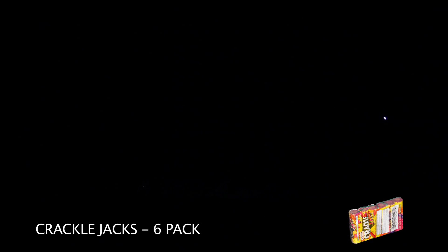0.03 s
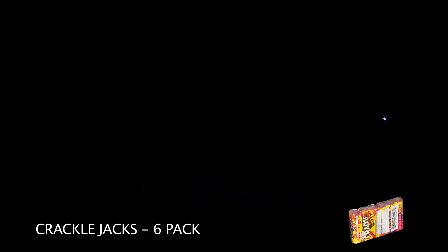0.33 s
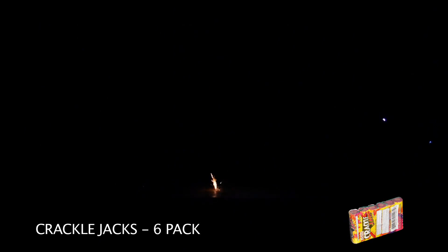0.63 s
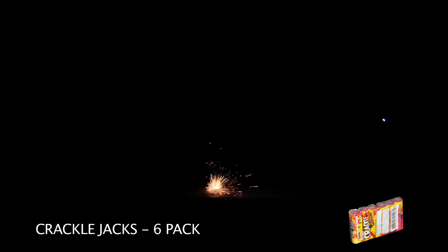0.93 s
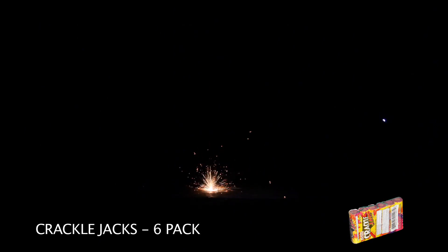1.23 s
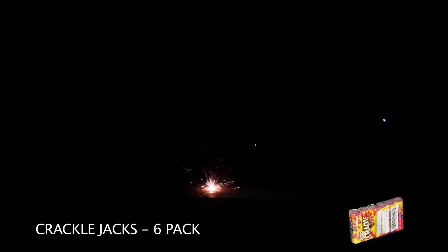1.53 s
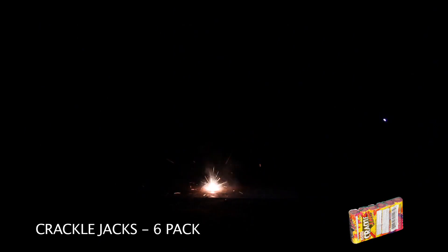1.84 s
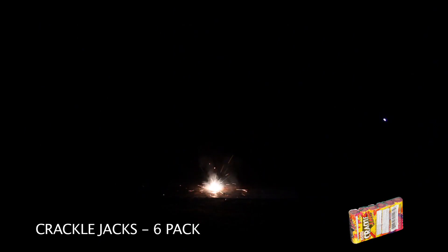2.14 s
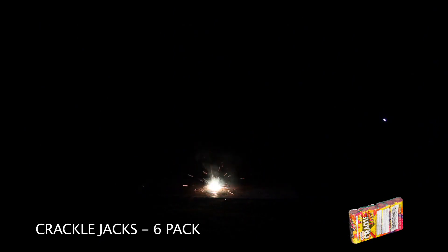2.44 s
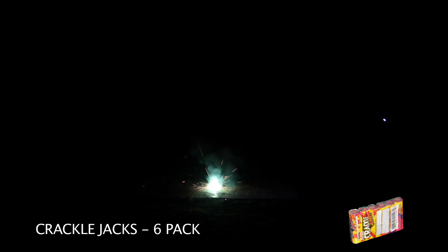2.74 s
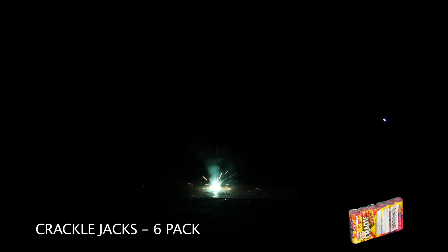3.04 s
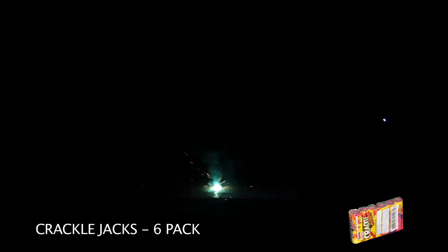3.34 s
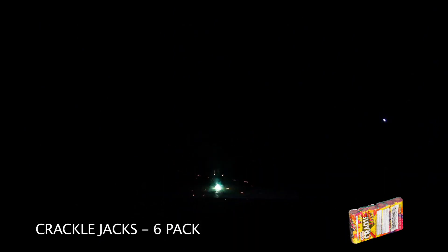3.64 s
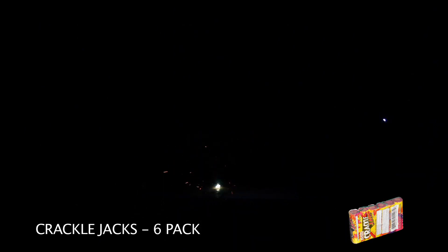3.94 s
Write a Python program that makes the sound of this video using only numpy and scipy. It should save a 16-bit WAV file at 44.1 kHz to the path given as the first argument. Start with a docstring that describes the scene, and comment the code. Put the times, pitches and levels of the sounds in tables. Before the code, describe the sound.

A ground spinner firework catches and hisses steadily, crackling and faintly whirring outdoors.

```python
"""A small ground spinner at night, a few metres away. First a fuse fizzes over night air, a faint tone, a
far-off rush and soft thumps. At 0.6 s the charge catches: a turbulent gas jet hisses and roars, full of
the tiny cracks of burning grains, and spits hardest in its first second. From about 1 s the case spins up
and whirs at two rates, each rotation modulating the hiss. The jet dulls and a few more thumps sound;
near 3.7 s it sags and flares again as the faint tone returns."""
import sys
import numpy as np
from scipy import signal
from scipy.fft import rfft, irfft
from scipy.io import wavfile

SR = 44100
rng = np.random.default_rng(int(sys.argv[2]) if len(sys.argv) > 2 else 0)


def generate_wav(signal):
    """Clip the signal to [-1, 1] and save it as 16-bit WAV at the path in sys.argv[1]."""
    frames = np.transpose(np.atleast_2d(signal))
    scaled = np.clip(frames, -1, 1) * 32767
    pcm = np.round(scaled).astype(np.int16)
    wavfile.write(sys.argv[1], SR, pcm)


N = 176400
TIME, FREQ = np.arange(N) / SR, np.arange(N // 2 + 1) * SR / N


def undb(db):
    """Decibels to amplitude ratio."""
    return 10 ** (np.asarray(db) / 20)


def unit(x):
    """Normalise to rms 1."""
    return x / np.sqrt(np.mean(x ** 2) + 1e-20)


def curve(table, column=1):
    """Linear interpolation of one column in time."""
    rows = np.array(table, float)
    return np.interp(TIME, rows[:, 0], rows[:, column])


def colour(x, spectrum):
    """Minimum-phase filter of unit energy, shaped by (f/Hz, level/dB) points."""
    hz, db = np.array(spectrum, float).T
    cepstrum = irfft(np.log(undb(np.interp(np.log(FREQ + 1), np.log(hz), db))), N)
    cepstrum[1:N // 2] *= 2  # folding makes the filter causal
    cepstrum[N // 2 + 1:] = 0
    response = np.exp(rfft(cepstrum))
    return irfft(rfft(x) * response / np.sqrt(np.mean(abs(response) ** 2)), N)


def noise():
    """Gaussian white noise."""
    return rng.standard_normal(N)


def band(hz, width_hz):
    """Noise filtered by one resonance, rms 1."""
    f = FREQ + 1
    return unit(irfft(rfft(noise()) / (1 + ((f - hz ** 2 / f) / width_hz) ** 2), N))


def walk(hz):
    """Random fluctuation of rms 1, band-limited to about hz."""
    return unit(irfft(rfft(noise()) * np.exp(-2 * (FREQ / hz) ** 2) * FREQ / (FREQ + 2), N))


def split(x, hz, order):
    """Complementary low-pass and high-pass parts."""
    low = irfft(rfft(x) / (1 + (FREQ / hz) ** order), N)
    return low, x - low


def cracks():
    """Shot noise: burning grains click at random, many small and a few large."""
    per_second, spread_db = 2600, 3.0
    size = undb(spread_db * np.minimum(rng.exponential(size=N), 5))
    return unit((rng.random(N) < per_second / SR) * size * np.sign(noise()))


# Spectrum of the fuse: f/Hz, relative level/dB
FUSE_SPECTRUM = [(700,-2),(1100,1),(1650,-0.5),(2200,-1),(3500,-2),(5100,-1),(5400,5),(5700,-1),(7000,-3.5),(9000,-13.5),(12000,-21.5),(15500,-25)]
# Envelope of the fuse: t/s, level/dB
FUSE_ENVELOPE = [(.08,-49),(.21,-48.5),(.29,-45.5),(.37,-46),(.45,-47.5),(.55,-45),(.7,-42.5),(.9,-72)]
def fuse():
    """Combustion noise, brighter when stronger, interferes with its ground reflection."""
    level_db = curve(FUSE_ENVELOPE)
    low, high = split(colour(unit(noise() + .5 * cracks()), FUSE_SPECTRUM), hz=6000, order=4)
    fizz = low + high * undb(0.54 * (level_db + 48))  # treble is lifted above -48 dB, cut below
    reflection = undb(-10) * np.roll(fizz, int(0.00176 * SR))
    return (fizz + reflection) * undb(level_db)


# Spectrum of the outdoor air: f/Hz, relative level/dB
AIR_SPECTRUM = [(20,-8),(40,-27),(70,-7),(110,0),(160,-3.5),(215,-8.5),(330,-2.5),(450,-2),(540,-7),(690,-4.5),(860,-9.5),(1100,-5),(1400,-11.5),(1650,-6.5),(2200,-14.5),(5000,-28),(15000,-54)]
def night_air():
    """Stationary ambient noise, strongest at low frequencies."""
    return undb(-48) * colour(noise(), AIR_SPECTRUM)


# Envelope of the faint tone: t/s, level/dB
HUM_ENVELOPE = [(.08,-49),(.19,-54.5),(.27,-71),(3.6,-70),(3.7,-53),(3.8,-49),(3.88,-71)]
def hum():
    """A sinusoid with slight random frequency modulation, heard at the start and near the end."""
    hz = 332.7 + 2 * walk(9.5)
    return np.sqrt(2) * undb(curve(HUM_ENVELOPE)) * np.sin(2 * np.pi * np.cumsum(hz) / SR)


# Course of the far-off rush: t/s, level/dB, centre f/Hz
RUSH_GLIDE = [(.08,-49,660),(.35,-51,630),(.55,-47,550),(.68,-47,490),(.85,-58,444),(1.5,-82,418)]
def rush():
    """Narrow-band noise: random quadrature modulation of a carrier that sinks in pitch."""
    phase = 2 * np.pi * np.cumsum(curve(RUSH_GLIDE, column=2)) / SR
    return unit(walk(254) * np.sin(phase) + walk(254) * np.cos(phase)) * undb(curve(RUSH_GLIDE))


# Soft thumps: onset t/s, level/dB, centre f/Hz, width/Hz, decay time/s
THUMP_EVENTS = [(.129,-39.5,900,220,.01),(.142,-39,150,85,0.031),(.151,-37.5,80,40,0.054),(1.881,-35.5,293,120,0.012),(1.882,-41,159,70,0.0099),(3.04,-39.5,328,130,0.013),(3.045,-44,130,100,0.016),(3.745,-47,160,70,.05)]
def thumps():
    """Damped resonances: bands of noise rise linearly and decay exponentially."""
    attack_s, out = 0.012, 0
    for onset, db, hz, width_hz, decay_s in THUMP_EVENTS:
        age = np.maximum(TIME - onset, 0)
        envelope = np.minimum(age / attack_s, 1) * np.exp(-np.maximum(age - attack_s, 0) / decay_s)
        out = out + undb(db) * band(hz, width_hz) * envelope
    return out


# Spectrum of the gas jet: f/Hz, relative level/dB
JET_SPECTRUM = [(500,-39),(700,-27),(830,-29.5),(950,-22),(1100,-22.5),(1760,-17.5),(1970,-14),(2100,-15.5),(2280,-11),(2480,-15),(2700,-10),(3030,-12.5),(3450,-4.5),(3750,-9),(3950,-6),(4200,-6.5),(4800,-1),(5100,-2.5),(5450,0),(6350,-3),(6600,-1.2),(7300,-3.5),(7750,-6),(8000,-6.5),(8350,-11.5),(8650,-10),(9500,-13.5),(10500,-17),(11200,-21.5),(11800,-27.5),(12700,-32),(13800,-31),(15500,-38.5)]
# Envelope of the jet: t/s, level/dB
JET_ENVELOPE = [(.6,-50),(.64,-41),(.665,-29),(.765,-17),(.85,-17),(.885,-21.5),(.94,-16),(.98,-24.5),(1.03,-21),(1.11,-23.5),(1.17,-22),(1.4,-21),(1.6,-23.5),(1.73,-19),(1.9,-19),(2.31,-23),(2.37,-21),(2.58,-21),(2.63,-20),(2.705,-17.5),(2.75,-20),(2.8,-17),(2.85,-21),(3.08,-18),(3.14,-20.5),(3.55,-21),(3.63,-26.5),(3.695,-30.5),(3.725,-21.5),(3.85,-19.5),(4,-29)]
# Band gains of the jet, before their offsets: t/s, treble level/dB, middle level/dB, top level/dB
JET_BANDS = [(.7,-16,-19.5,-8),(.8,-13,-18,-20),(.94,-8.5,-14,-4),(1.0,-9,-11,-4),(1.1,-11.5,-12.5,-10),(1.45,-11,-16,-7),(1.62,-8.5,-15.5,-6),(1.8,-11.5,-17,-10),(2.15,-13,-19,-13),(2.3,-15,-16.5,-17),(2.42,-14.5,-16,-12),(2.75,-16,-17,-12),(3.06,-14.5,-15,-9),(3.15,-19,-16.5,-14),(3.54,-18,-13.5,-17),(3.68,-21.5,-6.5,-26.5),(3.74,-17,-12.5,-20),(3.86,-19.5,-14,-23),(4,-18.5,-9,-24)]
def jet(modulation_db):
    """Turbulent jet noise with cracking grains; the directional treble flickers as the nozzle swings."""
    gas = unit(noise() + undb(-6.5) * cracks()) * unit(undb(modulation_db))
    middle, rest = split(colour(gas, JET_SPECTRUM), hz=3150, order=6)
    main, rest = split(rest, hz=6970, order=10)
    treble, top = split(rest, hz=11900, order=24)
    middle *= undb(curve(JET_BANDS, column=2) + 15)
    treble *= undb(curve(JET_BANDS, column=1) + 13)
    top *= undb(curve(JET_BANDS, column=3) + 11)
    beam = unit(undb(1.78 * walk(176)))
    ignition = np.clip((TIME - JET_ENVELOPE[0][0]) / .03 + 1, 0, 1)
    return (main + middle + beam * (treble + top)) * undb(curve(JET_ENVELOPE)) * ignition


# Spectrum of the flame's roar: f/Hz, relative level/dB
ROAR_SPECTRUM = [(40,-19),(80,-5),(110,-8),(140,-6),(175,3.5),(232,-12),(280,4),(380,0.5),(450,-2),(535,-9.5),(700,0),(830,-4),(1100,-3),(2000,-24.5)]
# Envelope of the roar: t/s, relative level/dB
ROAR_ENVELOPE = [(.6,-29),(.78,7),(.92,11.5),(1.06,8),(1.25,7),(1.6,-7),(2.4,-5),(3.05,-3),(3.6,-10),(3.78,3.5),(4,-1)]
def roar(modulation_db):
    """Unsteady combustion radiates low, sputtering noise."""
    gas = unit((noise() + cracks()) * undb(modulation_db))
    return colour(gas, ROAR_SPECTRUM) * undb(curve(ROAR_ENVELOPE) - 52)


# Spits of the charge: t/s, relative swell level/dB, relative snap level/dB
SPIT_EVENTS = [(.856,-22,-9),(.915,-20,-6.5),(.944,-20,-6),(1.0116,-19,-10),(1.023,-18.5,-18),(1.047,-29,-11),(1.056,-19,-7),(1.084,-14,-2),(1.107,-18.5,-20),(1.147,-26,-17),(1.181,-16.5,-15),(1.199,-24,-11),(1.255,-21.5,-6),(1.307,-33,-9.5),(1.317,-30,-15),(1.365,-36,-7),(1.436,-18.5,-12),(1.4559,-38,-2.5),(1.526,-17.5,-26),(1.867,-31,-21),(2.18,-18,-18),(2.219,-19,-28),(2.54,-24,-21),(2.612,-20,-21),(2.671,-21,-8.5),(3.384,-32,-25),(3.563,-23,-8),(3.728,-19.5,-14)]
# Spectrum of a snap: f/Hz, relative level/dB
SNAP_SPECTRUM = [(60,-32),(300,-7),(1000,-8.5),(2200,-2),(5500,-2.5),(8000,-6),(11000,-18),(15500,-38)]
def spits():
    """Pressure transients: a lump of charge flares for milliseconds and snaps with a noisy tail."""
    swell_s, lead_s, tail_s = 0.0028, 0.0011, 0.00073
    swell, snap = np.zeros(N), np.zeros(N)
    for at, swell_db, snap_db in SPIT_EVENTS:
        swell += undb(swell_db) * np.exp(-.5 * ((TIME - at + lead_s) / swell_s) ** 2)
        snap[int(at * SR)] += undb(snap_db)
    debris = signal.lfilter([1], [1, -np.exp(-1 / (tail_s * SR))], snap) * noise()
    return colour(swell * noise(), JET_SPECTRUM) + colour(-1.4 * snap + 0.23 * debris, SNAP_SPECTRUM)


# The case whirling about itself: t/s, rotation f/Hz, level/dB
WHIRL_MOTION = [(.95,18.7,-87),(1.2,59.4,-72),(1.47,103,-59),(1.8,115,-58),(2.07,125,-70),(2.55,135,-58),(3.1,126,-60),(3.5,115,-68),(4,115,-66)]
# Partials of the whirl: harmonic number, relative level/dB
WHIRL_HARMONICS = [(1,0.5),(2,-12),(3,-12)]
# The case rolling more slowly along the ground: t/s, rotation f/Hz, level/dB
ROLL_MOTION = [(1.3,62,-80),(1.65,73,-72),(1.9,93,-57.5),(2.25,98,-58),(2.6,103,-56.5),(2.9,102,-66),(3.25,93,-57.5),(3.6,85,-60),(4,80,-59.5)]
# Partials of the roll: harmonic number, relative level/dB
ROLL_HARMONICS = [(1,-3.5),(2,-1.5),(3,-0.5),(4,-7.5)]
def rotation(motion, harmonics):
    """A rotating body radiates harmonics of its rotation frequency; returns its angle and whir."""
    jitter, waver_db = 0.0029, 2.5
    angle = 2 * np.pi * np.cumsum(curve(motion) * (1 + jitter * walk(31))) / SR
    whir = 0
    for k, db in harmonics:
        amplitude = undb(db + waver_db * walk(9.1))
        whir = whir + amplitude * np.sin(k * angle + 2 * np.pi * rng.random())
    return angle, np.sqrt(2) * whir * undb(curve(motion, column=2))


def scene():
    """Superposition of all sources; one flame modulates hiss and roar, and each turn chops the hiss."""
    flutter, surge_db = walk(480), 0.86 * walk(66)  # fast and slow unsteadiness of the flame
    whirl_angle, whirl = rotation(WHIRL_MOTION, WHIRL_HARMONICS)
    roll_angle, roll = rotation(ROLL_MOTION, ROLL_HARMONICS)
    moving = np.clip((TIME - WHIRL_MOTION[0][0]) / 0.12, 0, 1)
    chop_db = moving * (1.4 * np.sin(whirl_angle) + np.sin(roll_angle))
    flame = jet(1.2 * flutter + surge_db + chop_db) + roar(7 * flutter + surge_db)
    mix = flame + whirl + roll + spits() + fuse() + thumps() + rush() + hum() + night_air()
    return (mix * (TIME >= .08))[None]  # silent for the first 80 ms


def record(dry):
    """Clipping at full scale, then band-limiting by an elliptic low-pass filter."""
    low_pass = signal.ellip(10, .1, 80, 15700, fs=SR, output="sos")
    return signal.sosfilt(low_pass, np.clip(dry, -1, 1))


dry = scene()
out = record(dry)
generate_wav(out)
```